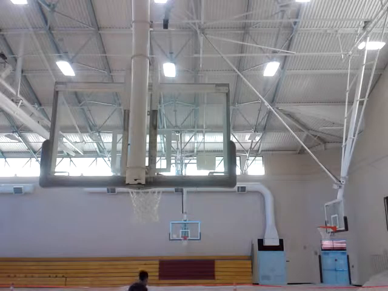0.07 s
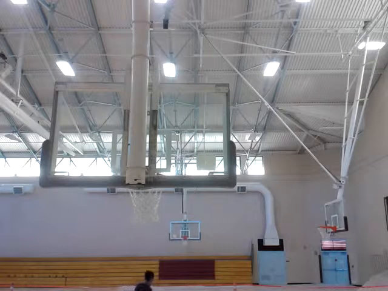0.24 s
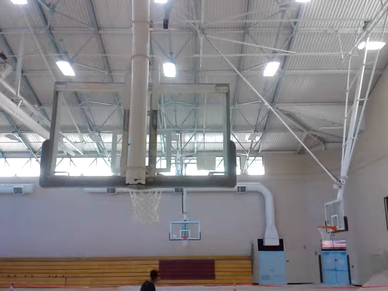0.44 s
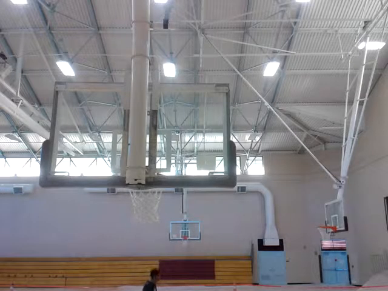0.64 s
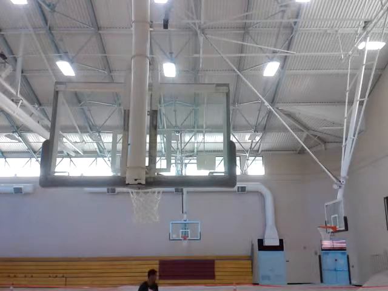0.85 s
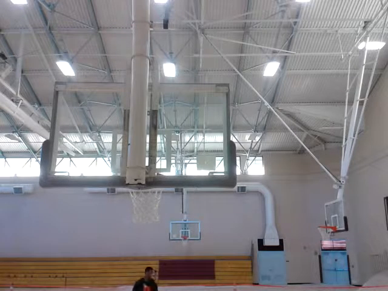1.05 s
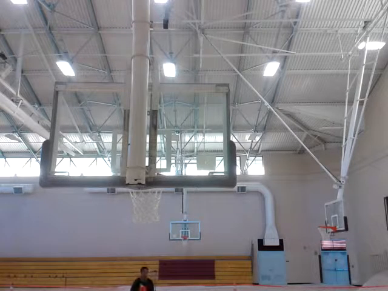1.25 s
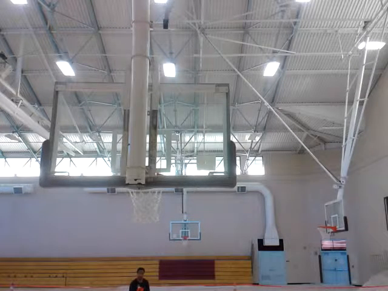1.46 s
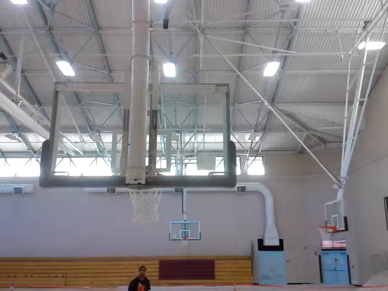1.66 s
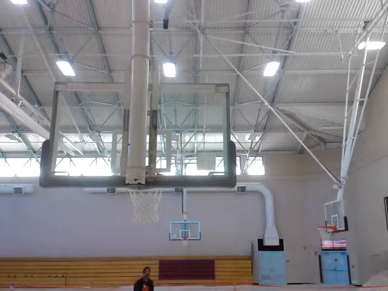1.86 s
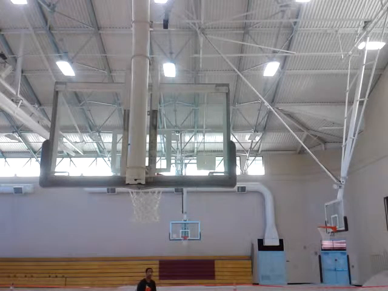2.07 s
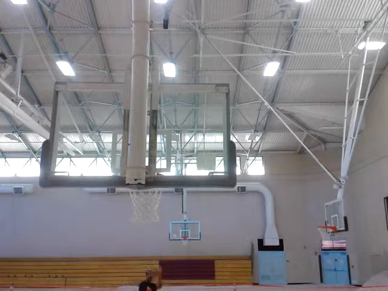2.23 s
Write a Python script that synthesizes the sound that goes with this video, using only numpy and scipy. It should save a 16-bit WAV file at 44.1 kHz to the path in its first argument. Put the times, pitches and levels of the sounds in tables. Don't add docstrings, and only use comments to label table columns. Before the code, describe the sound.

A basketball bounces three times on a wooden floor, booming through a large empty gym

```python
import sys
import numpy as np
from scipy import signal
from scipy.io import wavfile

SR = 44100
rng = np.random.default_rng(int(sys.argv[2]) if len(sys.argv) > 2 else 0)


def convert_level_to_amplitude(level_db):
    exponent = np.asarray(level_db, float) / 20
    return 10 ** exponent


def generate_wav(sig):
    pcm = np.round(np.clip(np.atleast_2d(sig).T, -1, 1) * 32767).astype(np.int16)
    wavfile.write(sys.argv[1], SR, pcm)


N = 101429


def ring(x, hz, t60):
    r, w = convert_level_to_amplitude(-60 / (t60 * SR)), 2 * np.pi * hz / SR
    return signal.lfilter([0, np.sin(w)], [1, -2 * r * np.cos(w), r * r], x + 1e-18)


def swell(click, hz, t60):
    return ring(click, hz, t60) - ring(click, hz, t60 / 4)


def cut(x, hz, kind):
    return signal.sosfilt(signal.butter(2, hz, kind, fs=SR, output="sos"), x)


def later(x, s):
    out, i = np.zeros(N), int(s * SR)
    n = min(len(x), N - i)
    out[i:i + n] = x[:n]
    return out


def rms_one(x):
    return x / np.sqrt(np.mean(x ** 2) + 1e-20)


def band_noise(low_hz, high_hz):
    return rms_one(cut(rng.standard_normal(N), [low_hz, high_hz], "band"))


def bounce(ping_db, thud_hz, bright_db):
    # pitch_hz, level_db, t60_s, delay_s
    air_modes = [
        (1574, -22.5, 0.003, 0.00046),
        (1098, -17.5, 0.022, 0.00187),
        (3190, -5.5, 0.0027, 0.00052),
        (738, -32.5, 0.085, 0.00026),
    ]
    # pitch_hz, level_db, t60_s
    board_modes = [
        (194.7, -9, 0.052),
        (315.7, -18, 0.046),
        (434.4, -22.5, 0.082),
    ]
    t = np.arange(SR // 4) / SR
    click = 1. * (t == 0)

    slap_s = .0005
    slap = -convert_level_to_amplitude(-2) * np.sin(np.pi * np.clip(t / slap_s, 0, 1)) ** 2
    snap_db, snap_t60_s = -6.5, .0048
    snap = cut(rng.standard_normal(len(t)), [2500, 10200], "band")
    snap = convert_level_to_amplitude(snap_db + bright_db - 60 * t / snap_t60_s) * snap
    ping = 0
    for hz, db, t60, delay_s in air_modes:
        ping = ping + 2 * convert_level_to_amplitude(db) * later(swell(click, hz, t60), delay_s)[:len(t)]

    whirl_hz, drop_hz, drop_s = 3990, 1600, .0008
    whirl_db, rise_s, whirl_t60_s = -4.5, .0021, .019
    phase = 2 * np.pi * np.cumsum(whirl_hz + drop_hz * np.exp(-t / drop_s)) / SR
    whirl = convert_level_to_amplitude(whirl_db + ping_db - 60 * t / whirl_t60_s) * np.sin(phase)
    whirl = whirl * (1 - np.exp(-(t / rise_s) ** 2))

    thud_db, thud_t60_s, thud_delay_s, thud_soft_hz = 2.5, .049, .00027, 655
    thud = swell(click, thud_hz, thud_t60_s)
    for hz, db, t60 in board_modes:
        thud = thud + convert_level_to_amplitude(db) * ring(click, hz, t60)
    thud = convert_level_to_amplitude(thud_db) * later(cut(thud, thud_soft_hz, "low"), thud_delay_s)[:len(t)]
    return slap + snap + ping, whirl, thud


def echoes(crack, ping, thud, echo_db):
    # delay_s, crack_db, ping_db, thud_db, top_hz
    reflections = [
        (.0098, -11.5, -30, -4, 1360),
        (.0415, -8.5, -19, -3, 13000),
        (0.056, -19, -25, -8.5, 2500),
        (0.104, -37, -41, -18.5, 5800),
        (0.126, -19, -31, -22, 6000),
        (0.185, -19.5, -33, -10.5, 4060),
    ]
    t = np.arange(SR // 20) / SR
    scatter_db, scatter_t60_s = -27.5, .037
    smear = convert_level_to_amplitude(scatter_db - 60 * t / scatter_t60_s) * rng.standard_normal(len(t))

    tick = 1. * (np.arange(len(crack)) == 10)
    thin = cut(crack - cut(tick, 9300, "low"), 1190, "high")
    roof_ring_db, roof_ring_hz, roof_ring_t60_s = -6.5, 2080, .002
    thin = thin + convert_level_to_amplitude(roof_ring_db) * ring(thin, roof_ring_hz, roof_ring_t60_s)

    back = 0
    for delay_s, crack_db, ping_db, thud_db, top_hz in reflections:
        arrival = convert_level_to_amplitude(crack_db) * thin + convert_level_to_amplitude(ping_db) * ping + convert_level_to_amplitude(thud_db) * thud
        back = back + convert_level_to_amplitude(echo_db) * later(cut(arrival, top_hz, "low"), delay_s)
    rough = cut(convert_level_to_amplitude(8.5) * back + later(crack, 0), 1040, "high")
    scattered = signal.fftconvolve(rough, smear)[:N]
    return later(crack + ping + thud, 0) + back + scattered


def bands():
    edges = 32 * 2 ** np.arange(0, 9.1, 1 / 3)
    white = rng.standard_normal((2, N))
    rows = []
    for k, (low, high) in enumerate(zip(edges, edges[1:])):
        noise = cut(white[k % 2], [low, high], "band")
        noise = cut(noise, [low * 0.79, high * 1.25], "band")
        rows.append((np.sqrt(low * high), rms_one(noise), high - low))
    return rows


def at_hz(rows, hz):
    f, *columns = np.transpose(rows)
    return [np.interp(np.log(hz), np.log(f), c) for c in columns]


def hall_response():
    # pitch_hz, level_db, build_up_s, hold_s, t60_s
    hall = [(35, -32, 0.028, 0.42, 3.1), (60.2, 6.5, 0.044, 0.37, 0.65), (132.4, 10, 0.018, 0.43, 0.73),
            (209.4, -4.5, 0.01, 0.17, 1.62), (396, -13.5, 0.0086, 0.12, 1.75), (805, -25, 0.01, 0.28, 1.17),
            (1620, -18, 0.017, 0.28, 1.63), (2500, -22.5, 0.035, 0.28, 1.62),
            (3760, -24, 0.013, 0.18, 1.17), (4760, -30, 0.036, 0.18, 0.82), (7000, -34, 0.01, 0.063, 0.71),
            (13000, -46, .02, 0.02, 0.74)]
    t, coloured, plain = np.arange(N) / SR, 0, 0
    for hz, noise, width in bands():
        db, rise, hold, t60 = at_hz(hall, hz)
        fall_s = np.logaddexp(0, (t - hold) / 0.044) * 0.034
        band = noise * np.sqrt(width / SR) * convert_level_to_amplitude(-60 * fall_s / t60)
        band = band * (1 - np.exp(-(t / rise) ** 2))
        coloured, plain = coloured + convert_level_to_amplitude(db) * band, plain + band
    return coloured, plain


def squeak():
    # start_s, length_s, start_hz, end_hz, level_db
    slips = [
        (1.366, .017, 6450, 5850, -34),
        (1.372, .011, 5450, 5050, -33),
        (1.383, .011, 4850, 4600, -31),
        (1.392, .04, 6400, 6080, -34),
        (1.39, .008, 5750, 5720, -35),
        (1.402, .022, 4950, 4890, -29),
        (1.426, .018, 4890, 4900, -33),
        (1.455, .07, 4905, 4895, -33),
        (1.378, .022, 4100, 3500, -41),
        (1.392, .05, 5350, 5250, -44),
    ]
    wobble_hz, flutter_db = 50, 4.5
    overtone_db, overtone_fade_db_s = -14, 200
    t, out = np.arange(N) / SR, 0
    chance = cut(rng.standard_normal((2, N)), 274, "low")
    chance = chance / chance.std()
    for k, (s, length, start_hz, end_hz, db) in enumerate(slips):
        u = np.clip((t - s) / length, 0, 1)
        wobble, flutter = np.roll(chance, k * SR // 10, axis=1)
        pitch_hz = start_hz + (end_hz - start_hz) * u + wobble_hz * wobble
        phase = 2 * np.pi * np.cumsum(pitch_hz) / SR
        shape = np.sin(np.pi * u ** 0.78) * convert_level_to_amplitude(db + flutter_db * flutter)
        overtone = convert_level_to_amplitude(overtone_db - min(overtone_fade_db_s * (s - slips[0][0]), 8))
        out = out + shape * (np.sin(phase) + overtone * np.sin(2 * phase))

    rub_db, rub_start_s, rub_end_s = -50, 1.368, 1.44
    u = np.clip((t - rub_start_s) / (rub_end_s - rub_start_s), 0, 1)
    return out + convert_level_to_amplitude(rub_db) * np.sin(np.pi * u ** .5) * band_noise(4400, 6800)


def soft_step(start_s, boom):
    step_db, step_hz, step_t60_s, boom_db = -24, 165, .05, -22
    step = ring(later(np.ones(1), start_s), step_hz, step_t60_s)
    return convert_level_to_amplitude(step_db) * cut(step, 860, "low") + convert_level_to_amplitude(boom_db) * later(cut(boom, 430, "low"), start_s)


def background():
    # pitch_hz, level_db (per Hz)
    old_tail = [(18, -40), (30, 1.5), (106, 13), (668, -21), (1020, -8), (2070, -17.5), (3940, -23),
                (4400, -31.5), (6000, -58), (7800, -68), (13200, -120)]
    # pitch_hz, width_hz, level_db
    old_squeak = [
        (4390, 340, -71.5),
        (2240, 400, -63),
    ]
    t = np.arange(N) / SR
    old_db, old_t60_s, rumble_db, hiss_db = -47.5, 2.0, -50, -72
    old = 0
    for hz, noise, width in bands():
        level_db = at_hz(old_tail, hz)[0] - 66 * (hz > 6000)
        old = old + noise * np.sqrt(width) * convert_level_to_amplitude(level_db)
    old = convert_level_to_amplitude(old_db) * rms_one(old)
    for hz, width, db in old_squeak:
        old = old + convert_level_to_amplitude(db) * band_noise(hz - width / 2, hz + width / 2)
    rumble = convert_level_to_amplitude(rumble_db) * band_noise(50, 300)
    hiss = convert_level_to_amplitude(hiss_db) * band_noise(4000, 14300)
    return old * convert_level_to_amplitude(-60 * t / old_t60_s) + rumble + hiss


def scene():
    # start_s, peak_db, ping_db, thud_hz, brightness_db
    bounces = [
        (0.2035, -5, 3, 143, -5),
        (0.8962, -3.5, 2.5, 135, -22),
        (1.4815, -2.5, 0.5, 116.4, -2.5),
    ]
    boom_levels = [
        -3.5,
        -5,
        -2.5,
    ]
    echo_levels = [
        -1,
        -4,
        -4,
    ]
    shared, plain = hall_response()
    other, _ = hall_response()
    share = 0.54
    out = background()
    for k, (row, boom_db, echo_db) in enumerate(zip(bounces, boom_levels, echo_levels)):
        s, db, ping_db, thud_hz, bright_db = row
        tail = share * shared + np.sqrt(1 - share ** 2) * other * (-1) ** k
        tail = tail + (convert_level_to_amplitude(bright_db) - 1) * cut(tail, 3500, "high")
        near = convert_level_to_amplitude(db) * echoes(*bounce(ping_db, thud_hz, bright_db), echo_db)
        out = out + later(near + convert_level_to_amplitude(boom_db) * tail, s)

    shoe = convert_level_to_amplitude(-3) * squeak()
    shoe_hall = signal.fftconvolve(cut(shoe, 6500, "low"), plain)[:N]
    out = out + shoe + convert_level_to_amplitude(-32.5) * shoe_hall + soft_step(2.2145, shared)
    return out[None]


def top_cut(x):
    return signal.sosfilt(signal.butter(12, 16610, fs=SR, output="sos"), x)


def record(dry):
    mix = cut(dry, 45, "high")
    return top_cut(mix)


dry = scene()
out = record(dry)
generate_wav(out)
```